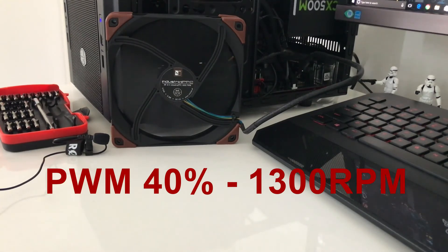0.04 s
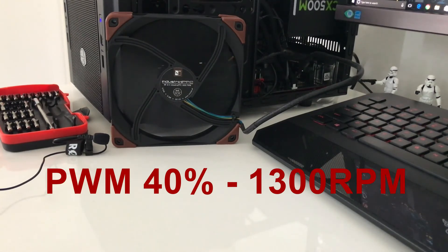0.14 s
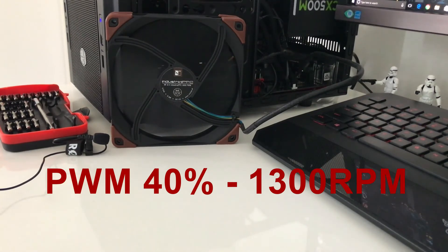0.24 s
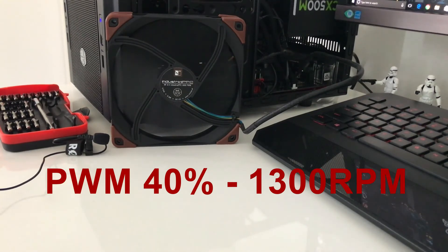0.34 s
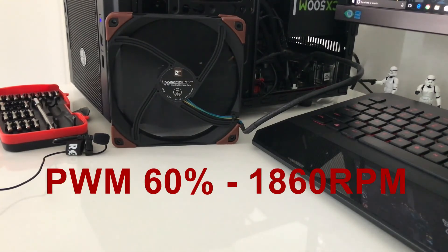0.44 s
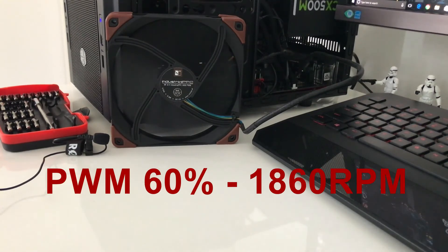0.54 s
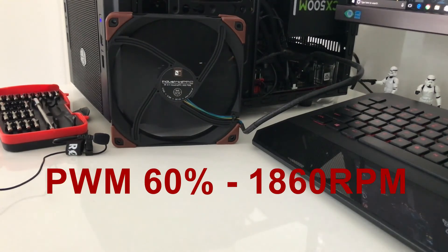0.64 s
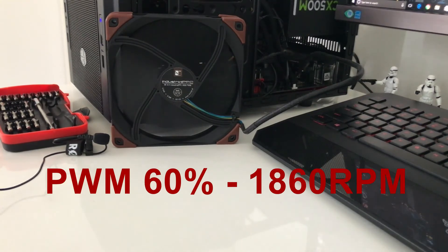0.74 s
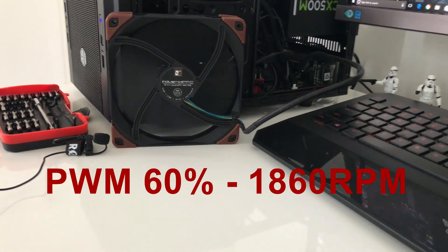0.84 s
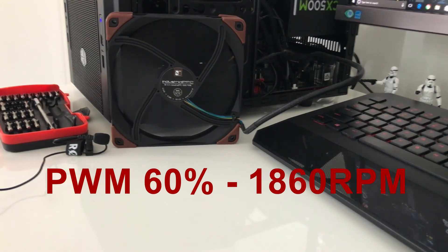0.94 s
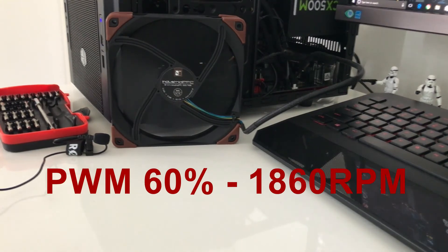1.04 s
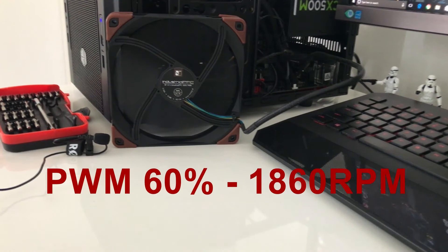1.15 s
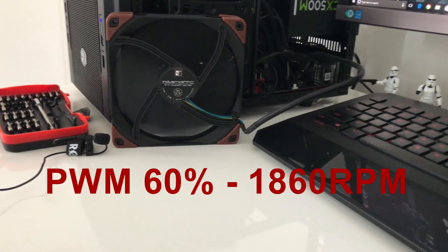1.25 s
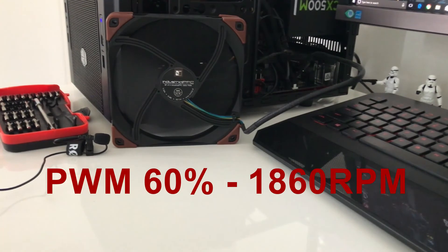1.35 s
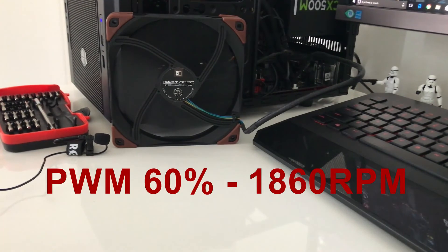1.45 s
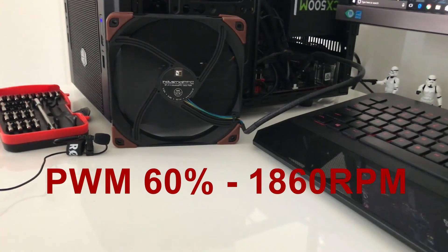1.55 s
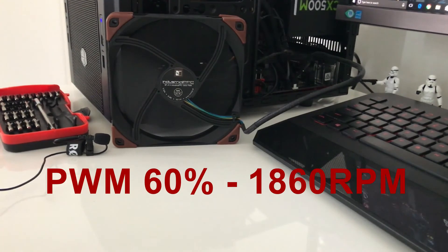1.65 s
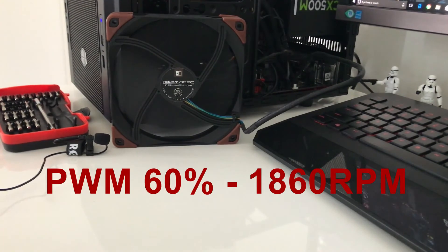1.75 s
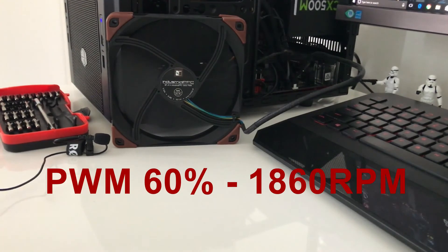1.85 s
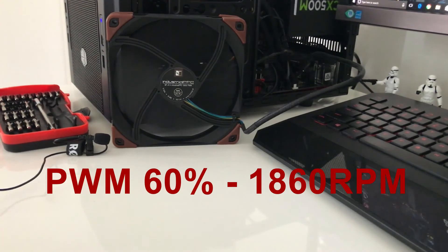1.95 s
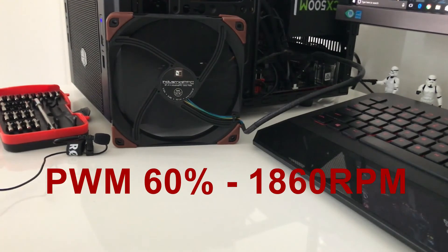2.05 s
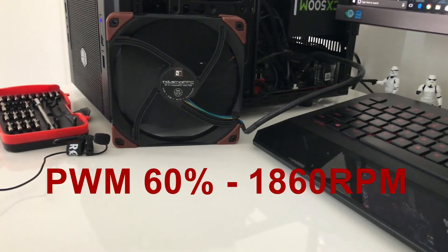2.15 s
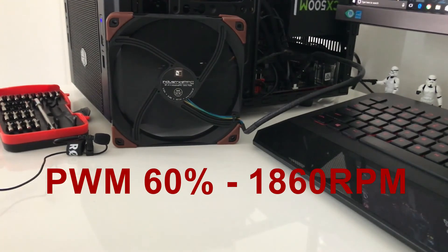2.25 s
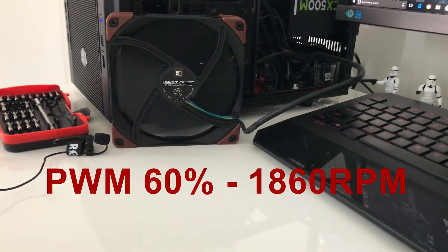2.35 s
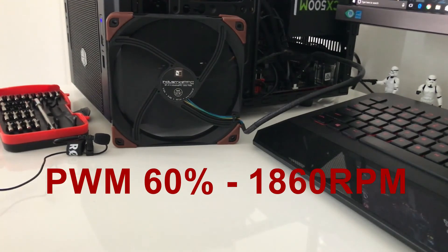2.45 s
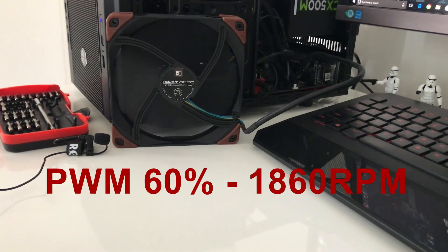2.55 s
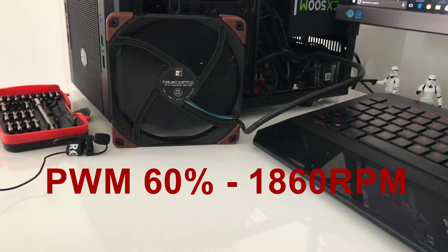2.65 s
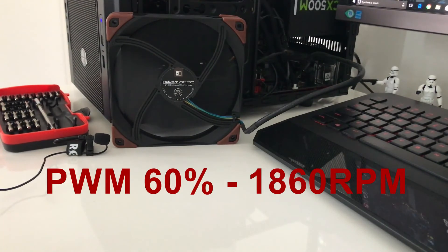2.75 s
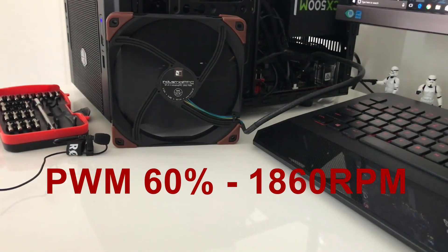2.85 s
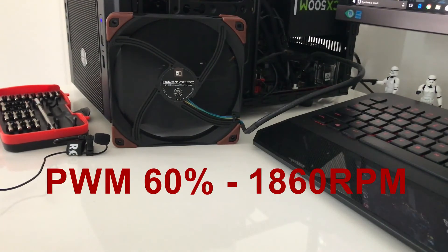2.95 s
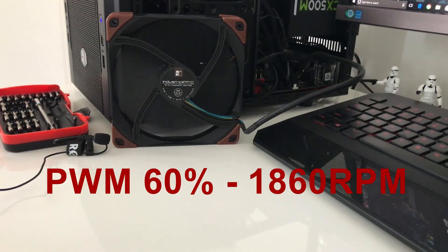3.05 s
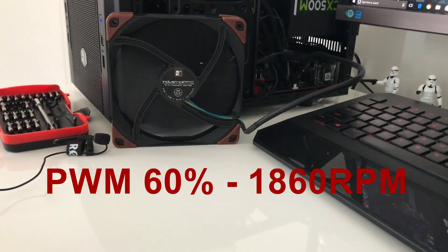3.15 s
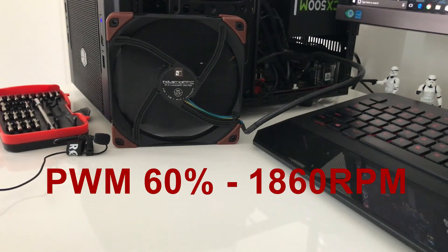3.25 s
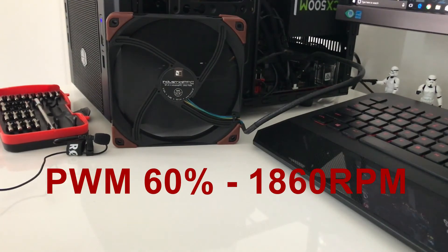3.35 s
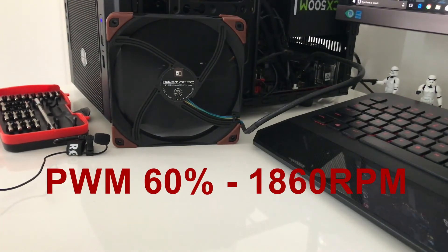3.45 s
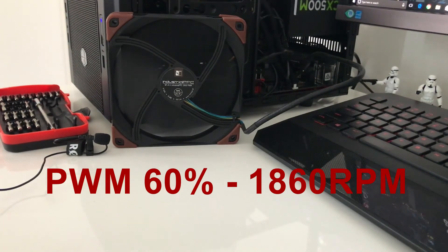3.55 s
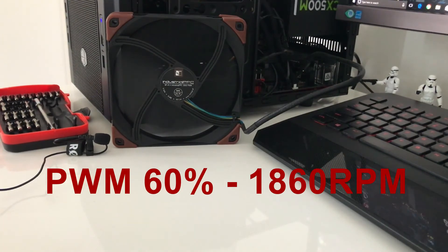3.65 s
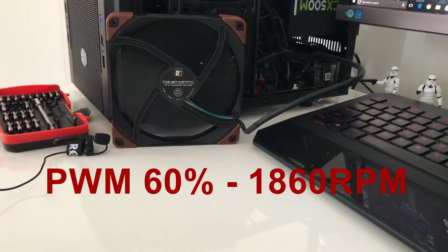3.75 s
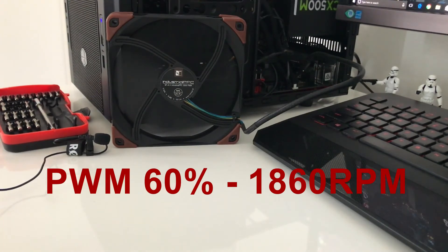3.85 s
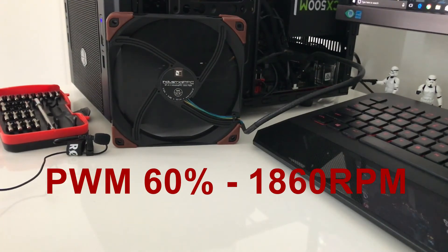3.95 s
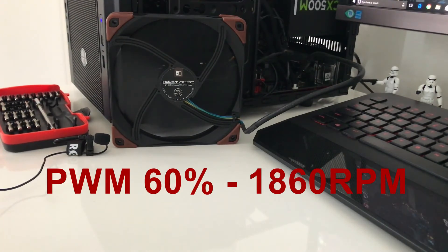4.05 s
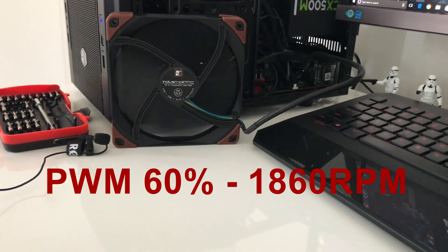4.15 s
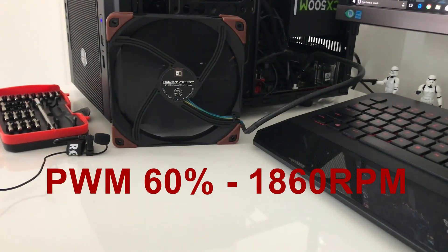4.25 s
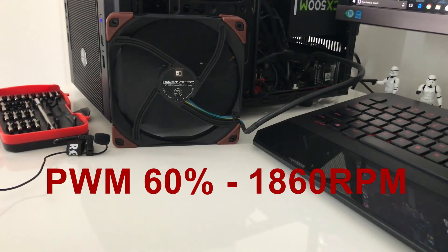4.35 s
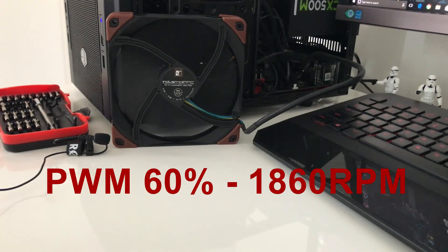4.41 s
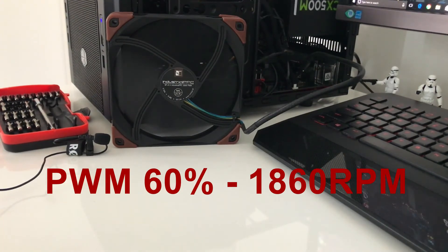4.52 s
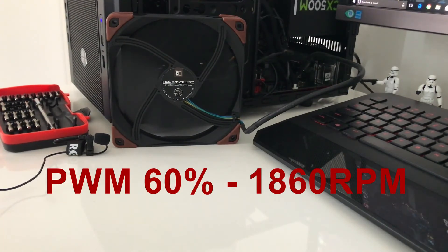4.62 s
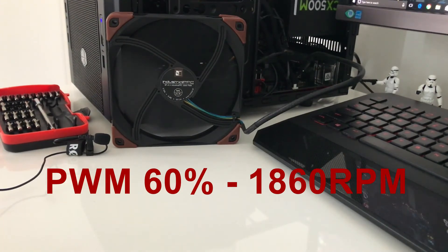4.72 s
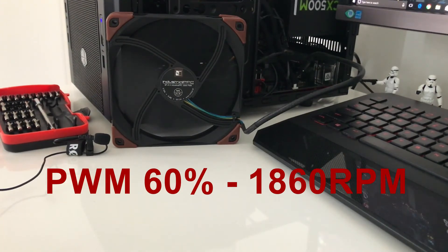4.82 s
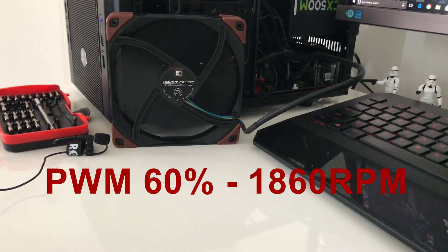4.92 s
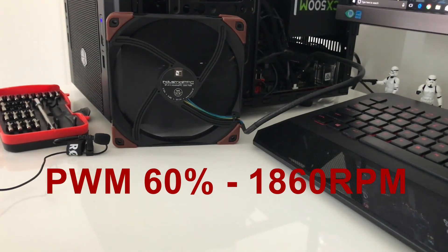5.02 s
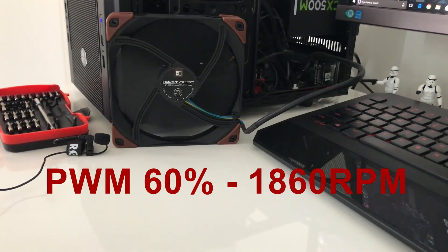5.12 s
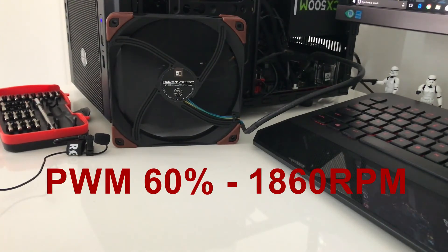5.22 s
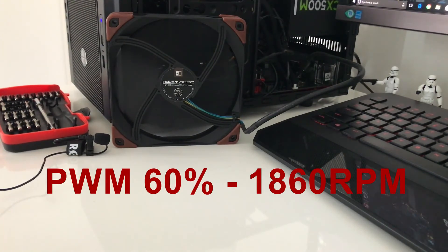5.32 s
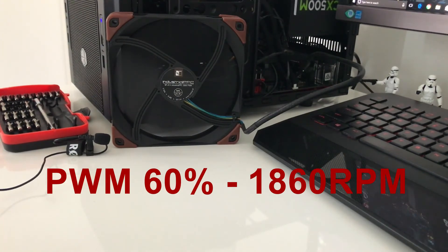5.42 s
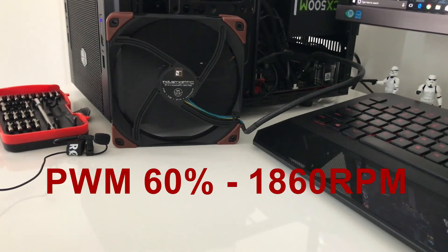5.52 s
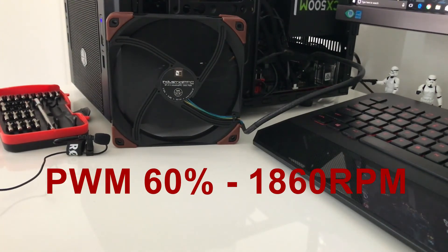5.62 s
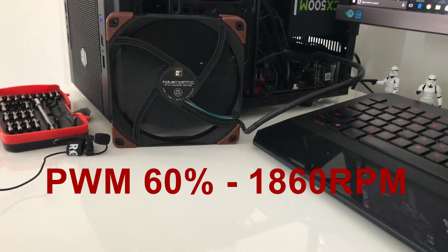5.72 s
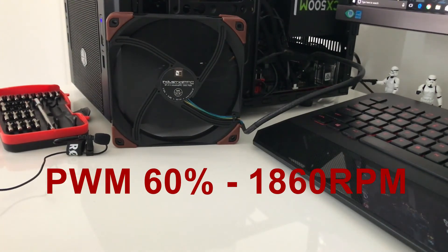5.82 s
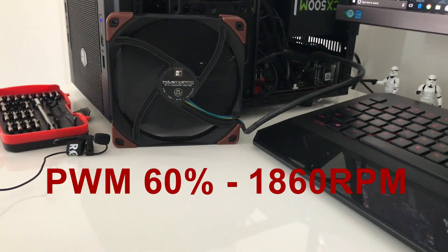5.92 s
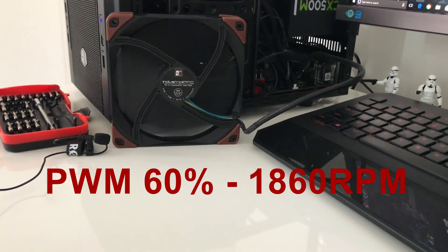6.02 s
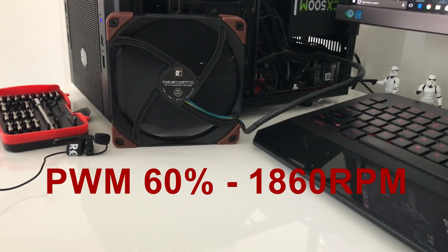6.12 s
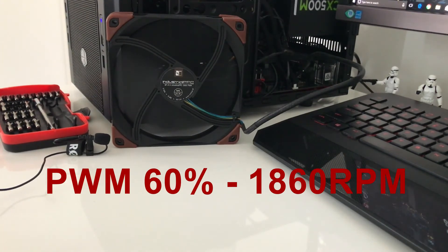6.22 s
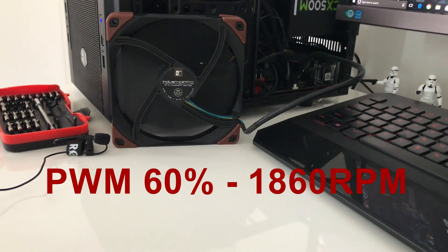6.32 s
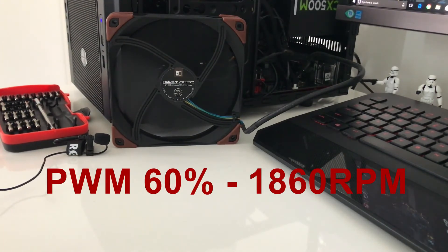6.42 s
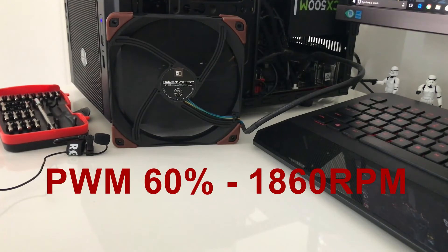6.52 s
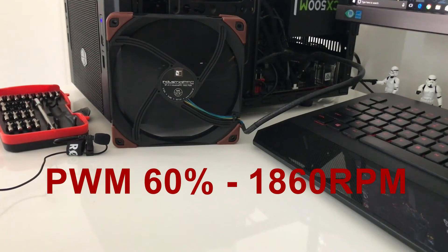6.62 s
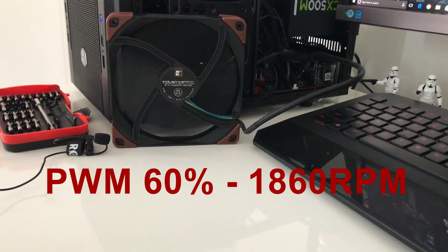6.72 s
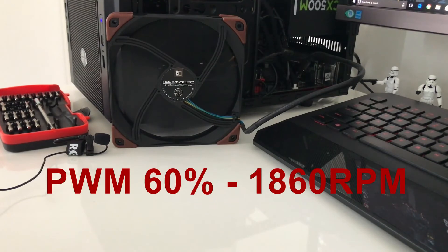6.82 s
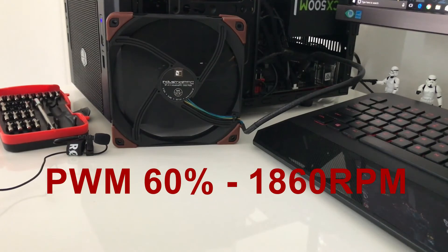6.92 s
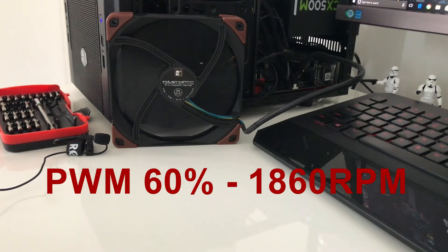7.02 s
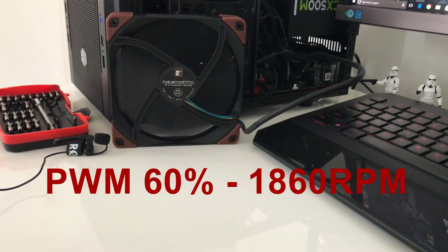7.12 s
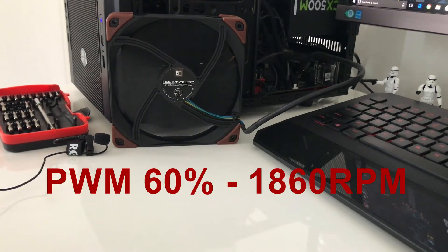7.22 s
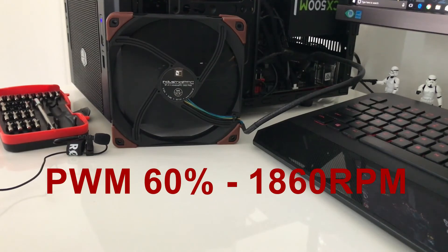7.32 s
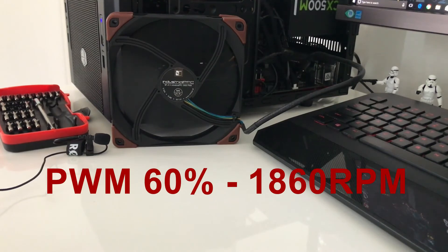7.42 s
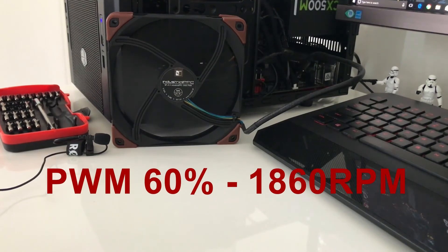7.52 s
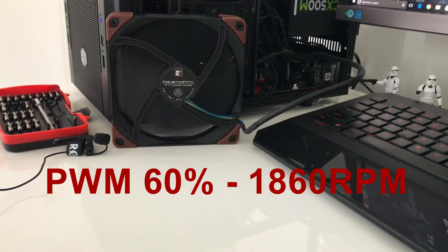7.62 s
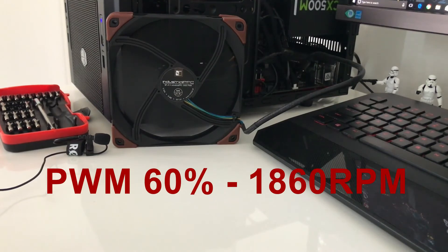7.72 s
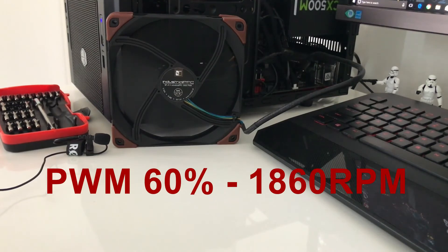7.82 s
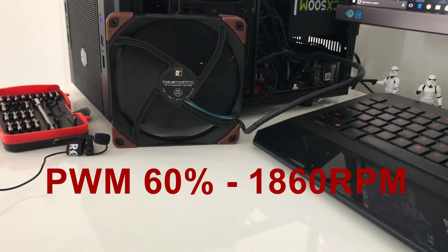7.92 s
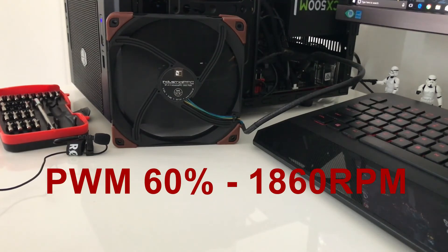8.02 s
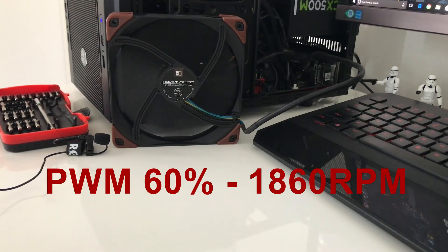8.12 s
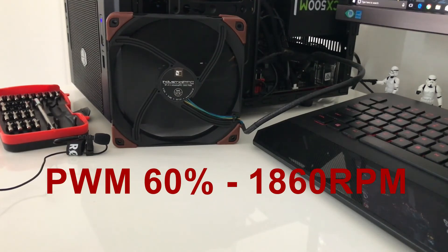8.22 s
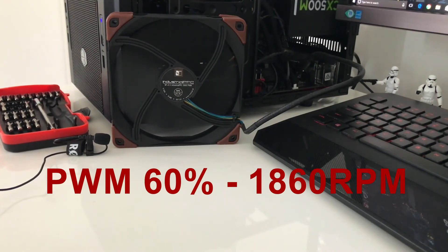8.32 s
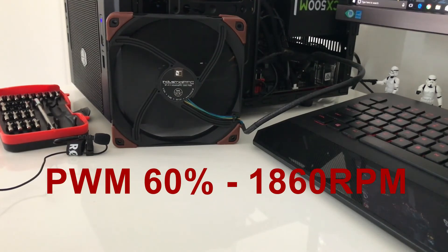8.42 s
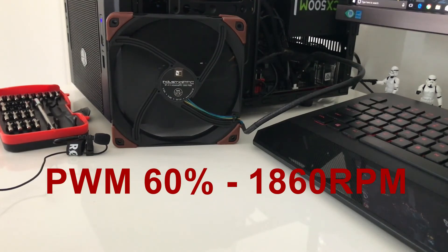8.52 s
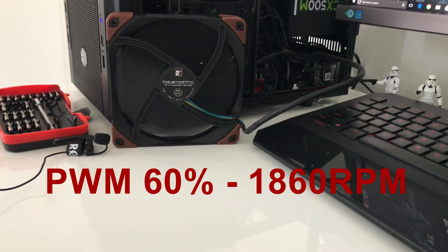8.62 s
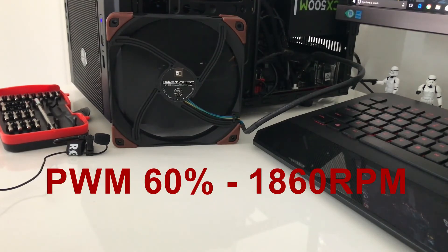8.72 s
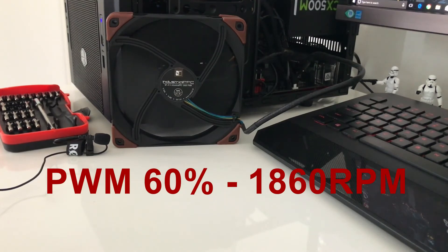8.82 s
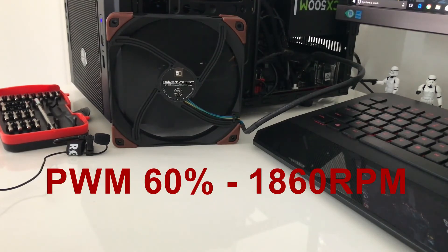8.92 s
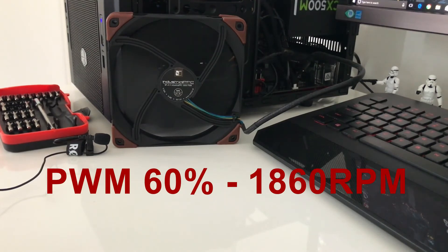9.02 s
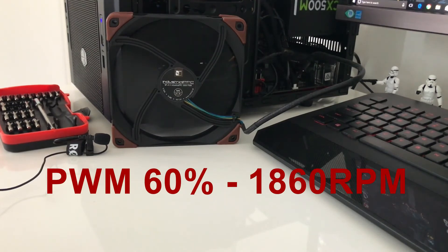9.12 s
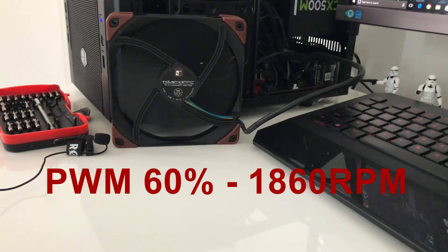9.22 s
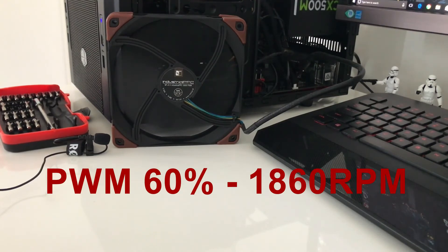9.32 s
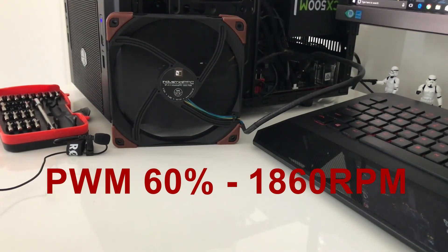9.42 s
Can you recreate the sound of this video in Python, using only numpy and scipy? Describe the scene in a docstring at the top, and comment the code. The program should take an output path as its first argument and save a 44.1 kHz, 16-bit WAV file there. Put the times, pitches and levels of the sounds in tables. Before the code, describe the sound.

A small cooling fan whirs softly, jumps abruptly to a louder, higher hum with a brief dropout, then blows steadily with low wind buffeting.

```python
"""A steady low whir jumps abruptly to a higher, louder one; the sound drops out for an instant just after.
A seven-blade computer fan runs on a desk, close to the microphone, first slowly and then faster.
Its blades hum as fluttering harmonics of the blade rate and chop the rushing air, made of shaped noise.
Its draught buffets the microphone: low rumble from noise, soft thumps from single pressure dips."""
import sys
import numpy as np
from scipy import signal
from scipy.fft import rfft, irfft
from scipy.io import wavfile

SR = 44100
rng = np.random.default_rng(int(sys.argv[2]) if len(sys.argv) > 2 else 0)


def persist_wave(psi):
    """Save psi, clipped to +-1, as 16-bit WAV."""
    counts = np.round(np.clip(psi, -1, 1) * 32767).astype(np.int16)
    wavfile.write(sys.argv[1], SR, np.atleast_2d(counts).T)


N = 417186
TIME = np.arange(N) / SR
FREQ = np.fft.rfftfreq(N, 1 / SR)

STEP_S = 0.5473  # change of speed
SLOW_HZ, FAST_HZ = 156.33, 219.42  # blade passes per second; the faster is the settled rate
SHORT_HZ, SETTLE_S = 2.1, 0.68  # start below FAST_HZ, time constant of the approach


def gain_of(db):
    """Decibels to amplitude gain."""
    return 10 ** (np.asarray(db) / 20)


def evened(x):
    """Scales to an rms of one."""
    return x / np.sqrt(np.mean(x ** 2) + 1e-20)


def curve(t_s, values):
    """Joins the points by straight lines over the whole scene."""
    return np.interp(TIME, t_s, values)


def wander(rate_hz):
    """Smooth random signal of unit rms, rolled off above rate_hz."""
    knots_s = np.arange(0, TIME[-1] + 1, 1 / 2048)
    hz = np.fft.rfftfreq(len(knots_s), knots_s[1])
    lowpass = (hz > 0) / (1 + (hz / rate_hz) ** 4)
    slow = irfft(rfft(rng.standard_normal(len(knots_s))) * lowpass, len(knots_s))
    return evened(curve(knots_s, slow))


def coloured(white, points, extra_db=0):
    """Gives unit white noise a spectrum (f/Hz, level/dB per Hz), joined over log frequency."""
    hz, db = np.transpose(points)
    level_db = np.interp(np.log(FREQ + 1), np.log(hz + 1), db) + extra_db
    return irfft(rfft(white) * gain_of(level_db), N) * np.sqrt(SR / 2)


def crossfade(low, high, hz):
    """Takes the bass of one noise and the treble of another, at constant power."""
    low_share = 1 / (1 + (FREQ / hz) ** 4)
    return irfft(rfft(low) * np.sqrt(low_share) + rfft(high) * np.sqrt(1 - low_share), N)


# background hiss spectrum once sunk: f/Hz, level/dB [per Hz]
HISS = [(100, -95), (1000, -104), (6000, -121), (11000, -120.5), (15500, -124.5)]


def background_hiss(start_db=5, sink_s=0.12):
    """Steady shaped noise, stronger by start_db at first and soon sinking."""
    extra_db = start_db * np.exp(-(TIME / sink_s) ** 2)
    return coloured(rng.standard_normal(N), HISS) * gain_of(extra_db)


# largest eddies at the microphone: t/s, suction depth/dB
THUMPS = [(.673, -23), (1.051, -23), (3.458, -24), (3.495, -22), (4.125, -24), (4.686, -20), (5.441, -19.5),
          (6.51, -24), (7.332, -20), (7.929, -24), (8.697, -24), (8.99, -21)]


def thumps(half_core_s=0.0045):
    """A large eddy passes the microphone: a dip in pressure between two shallow crests."""
    out = np.zeros(N)
    for t_s, depth_db in THUMPS:
        near = abs(TIME - t_s) < 0.05
        offset = (TIME[near] - t_s) / half_core_s
        out[near] -= gain_of(depth_db) * (1 - offset ** 2) * np.exp(-offset ** 2 / 2)
    return out


# draught spectrum at the microphone, before trim and roll-off: f/Hz, level/dB [per Hz]
RUMBLE = [(5, -56.5), (14, -49), (30, -52.5), (55, -49), (80, -54), (130, -61), (190, -65.5), (300, -72),
          (700, -112.5)]
# slow drift of draught strength at the faster speed: t/s, level/dB
DRAUGHT = [(0.6, -0.5), (1.1, 0.5), (2.9, -1), (3.6, 1.5), (6.1, -1.5), (8, 1.5), (9.4, -0.5)]


def rumble(fast, trim_db=-0.33, suction=0.057, slow_db=-7, gust_db=0.7, gust_hz=5.4):
    """Draught eddies strike the microphone, too large to make treble; chance gusts vary their strength."""
    roll_off_db = -10 * np.log10(1 + (FREQ / 700) ** 6)
    eddies = coloured(rng.standard_normal(N), RUMBLE, trim_db + roll_off_db)
    # eddy cores suck: pressure dips are deeper than crests
    eddies = eddies - suction * eddies.std() * (evened(eddies) ** 2 - 1)
    drift_db = curve(*np.transpose(DRAUGHT))
    strength_db = fast * drift_db + (1 - fast) * slow_db + gust_db * wander(gust_hz)
    return eddies * gain_of(strength_db)


# echoes off desk and case, against the direct sound: delay t/s, level/dB
DESK = [(.00101, -42), (.00138, -39), (.00217, -35), (.00584, -24)]


def room(x, tail_db=-18, t60_s=0.34):
    """Close echoes and a faint decaying tail put a fine ripple on the rush; total energy gain is one."""
    t_s = np.arange(SR // 3) / SR
    tail = rng.standard_normal(len(t_s)) * gain_of(-60 * t_s / t60_s) * (t_s > 0.006)
    response = gain_of(tail_db) * tail / np.linalg.norm(tail)
    response[0] = 1
    for delay_s, echo_db in DESK:
        response[round(delay_s * SR)] += gain_of(echo_db)
    return signal.oaconvolve(x, response / np.linalg.norm(response))[:N]


def blade_bursts(passes, rise_passes, spread_db):
    """One turbulence burst per blade pass, quick to rise and slower to die; a few stand out."""
    strength = np.minimum(rng.exponential(1, N), 4.3)
    burst_gain = gain_of(spread_db * strength)[passes.astype(int)]
    age = passes % 1 / rise_passes
    return evened(burst_gain * age * np.exp(-age))


# rush of air at the faster speed: f/Hz, level/dB [per Hz]
AIR = [(120, -83), (340, -73), (650, -73), (820, -76), (1150, -77.5), (1800, -80), (2500, -84.0),
       (3200, -85.5), (4700, -92), (6400, -99.1), (7300, -103.5), (8600, -103.8), (12300, -108.4),
       (15300, -117.1)]


def rush(passes, fast, burst=0.51, fine_burst=0.56, eddy_db=1.3, swell_db=0.5,
         slow_db=-9.0, slow_tilt_db_per_octave=-1.65):
    """Swelling body of air, a hiss the blades chop, a steadier fizz; slower blades are softer and duller."""
    body, wake, edge, mist, tip = rng.standard_normal((5, N))
    swell = gain_of(swell_db * wander(rate_hz=24))
    bursts = blade_bursts(passes, rise_passes=0.071, spread_db=2.5)
    hiss = wake * gain_of(eddy_db * wander(rate_hz=450)) + burst * edge * bursts
    # finest eddies, shed at the blade tips, follow the large bursts only in part
    tip_bursts = evened(bursts + blade_bursts(passes, rise_passes=0.07, spread_db=3.5))
    fizz = mist + fine_burst * tip * tip_bursts
    air = crossfade(evened(body * swell), evened(hiss * swell), hz=1400)
    air = crossfade(air, evened(fizz), hz=4400)
    octaves = np.log2(np.clip(FREQ, 300, 6000) / 1000)
    slow_air = coloured(air, AIR, slow_db + slow_tilt_db_per_octave * octaves)
    return fast * coloured(air, AIR) + (1 - fast) * slow_air


# blade tones: multiple of blade rate, slow level/dB, fast level/dB, slow wander/dB, flutter [share of tone]
TONES = [(1, -35.7, -29.5, 0.2, 0.056), (2, -54.5, -51.7, 0.8, .35), (3, -63.5, -53, .4, .31),
         (4, -69, -61, 1, .24), (5, -61, -55, 0.1, 0.29), (6, -69.5, -64.5, 1.5, .4),
         (7, -70, -66.5, 0.7, .3), (9, -80, -77, 3, .46)]
# slow swell of two tones at the faster speed: t/s, third harmonic level/dB, fifth harmonic level/dB
OVERTONES = [(0.6, -4.5, 0.5), (2, -1, 2.5), (3.1, 2.5, 0), (4, -8.5, 3.5), (4.9, 0.5, 0), (6.1, 4.0, 0.5),
             (7.6, 0, -5), (8.3, 4, 0), (9.4, 1.5, -1)]


def hum(passes, fast):
    """Each blade passing the struts gives a pressure pulse; uneven inflow makes its harmonics flutter."""
    t_s, third_db, fifth_db = np.transpose(OVERTONES)
    swell_db = {3: curve(t_s, third_db), 5: curve(t_s, fifth_db)}
    out = np.zeros(N)
    for multiple, slow_db, fast_db, wander_db, flutter in TONES:
        k = round(multiple)
        level_db = fast * (fast_db + swell_db.get(k, 0)) + (1 - fast) * slow_db
        level_db = level_db + wander_db * wander(rate_hz=0.56)
        # complex flutter: amplitude and phase both move
        unsteady = 1 + flutter * (wander(rate_hz=22.5) + 1j * wander(rate_hz=28))
        carrier = np.exp(2j * np.pi * (k * passes + rng.random()))
        out += gain_of(level_db) * (unsteady * carrier).real
    return np.sqrt(2) * out  # levels are rms


def scene():
    """One rotor drives hum, chopping and draught; after the step it eases up to its new speed."""
    fast = curve([STEP_S - 0.001, STEP_S + 0.001], [0, 1])
    settling_hz = FAST_HZ - SHORT_HZ * np.exp(-np.maximum(TIME - STEP_S, 0) / SETTLE_S)
    passes = np.cumsum(fast * settling_hz + (1 - fast) * SLOW_HZ) / SR
    draught = thumps() + rumble(fast)
    air = room(rush(passes, fast))
    return (background_hiss() + draught + air + hum(passes, fast))[None]


# brief dropout: fade starts t/s, gone t/s, back t/s
DROPOUT = (0.554, .569, .594)


def record(dry, edge_hz=15720):
    """The brief dropout and soft ends, then a steep low-pass at edge_hz."""
    fade_s, gone_s, back_s = DROPOUT
    heard = curve([fade_s, gone_s, back_s, back_s + 0.0003], [1, 0, 0, 1])
    soft_ends = signal.windows.tukey(N, 0.0004)
    lowpass = signal.firwin(1023, edge_hz, window=("kaiser", 9), fs=SR)
    return signal.oaconvolve(dry * heard * soft_ends, lowpass[None], "same")


dry = scene()
out = record(dry)
persist_wave(out)
```